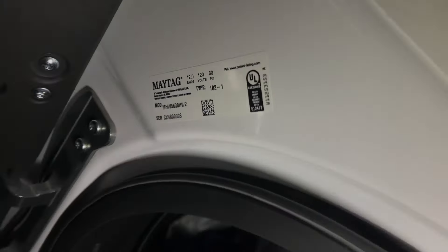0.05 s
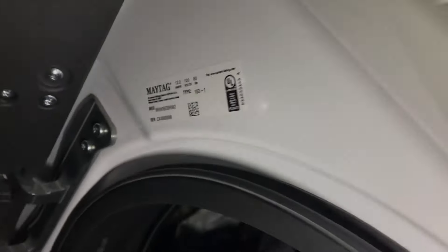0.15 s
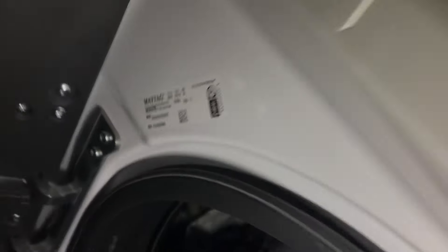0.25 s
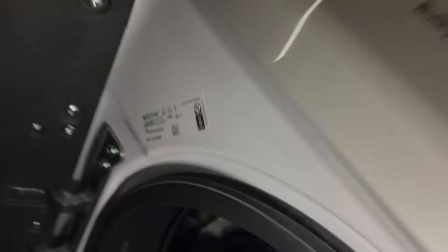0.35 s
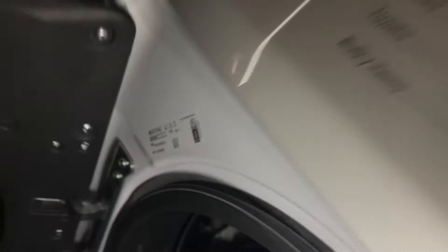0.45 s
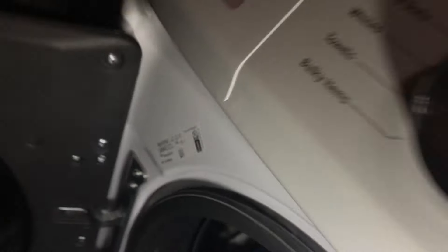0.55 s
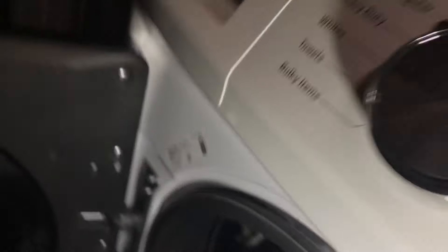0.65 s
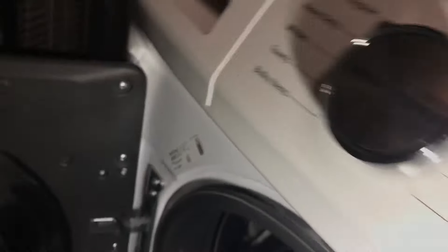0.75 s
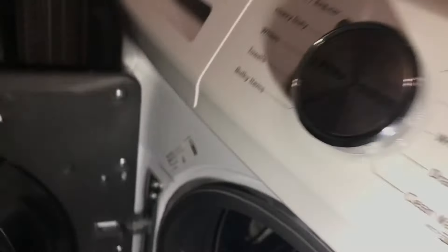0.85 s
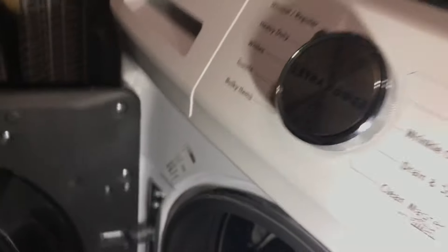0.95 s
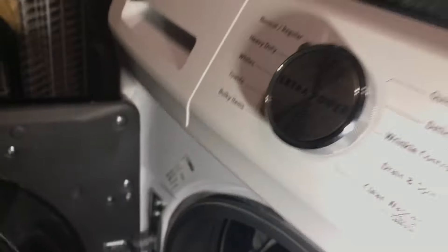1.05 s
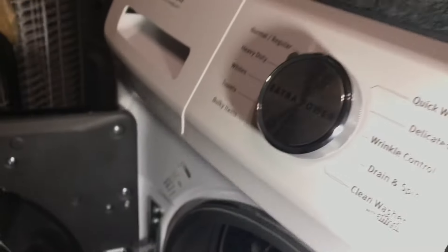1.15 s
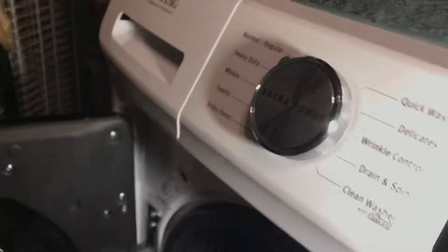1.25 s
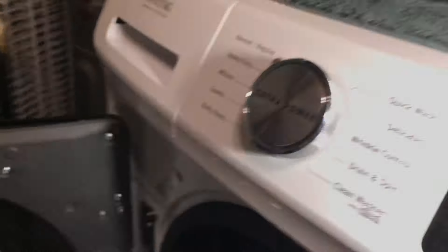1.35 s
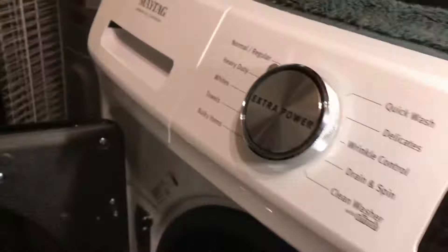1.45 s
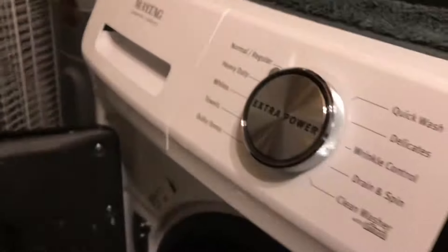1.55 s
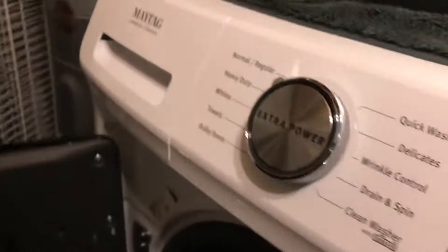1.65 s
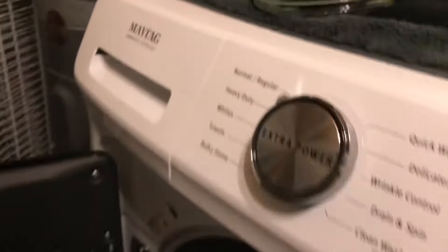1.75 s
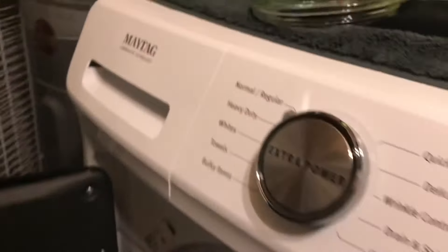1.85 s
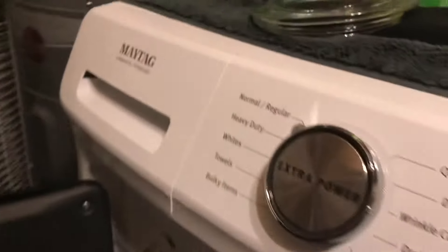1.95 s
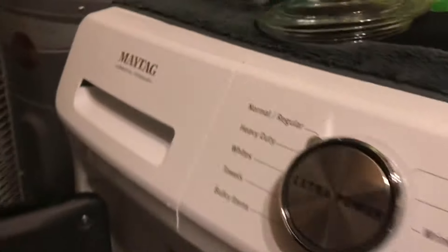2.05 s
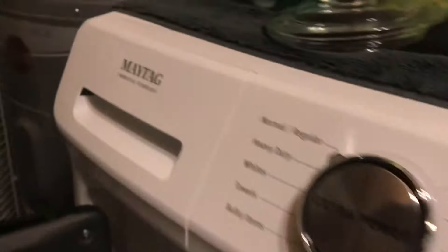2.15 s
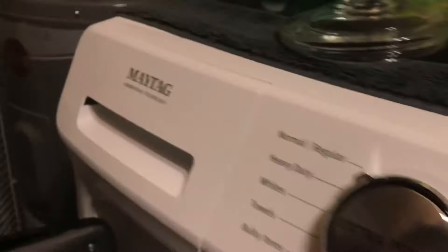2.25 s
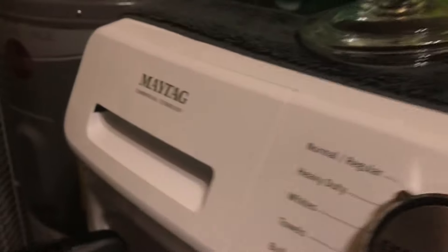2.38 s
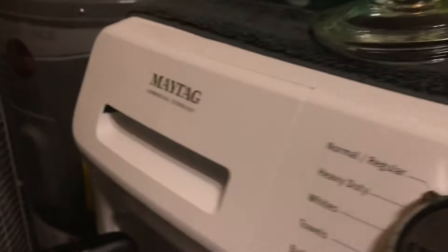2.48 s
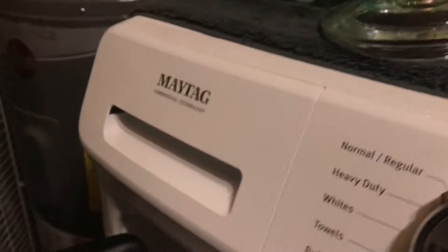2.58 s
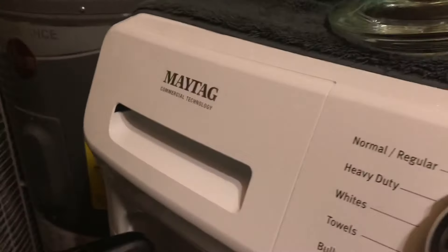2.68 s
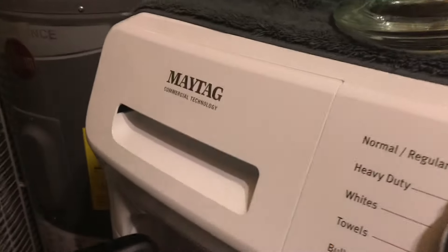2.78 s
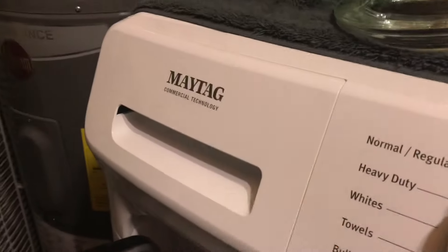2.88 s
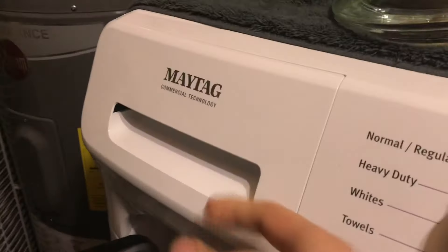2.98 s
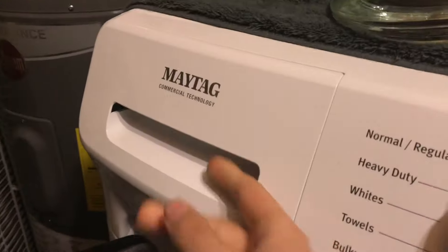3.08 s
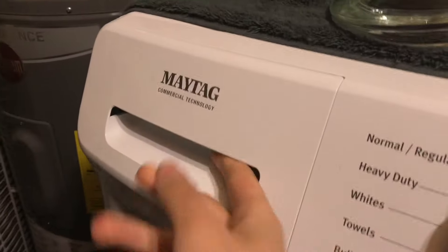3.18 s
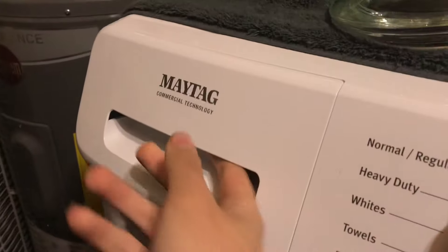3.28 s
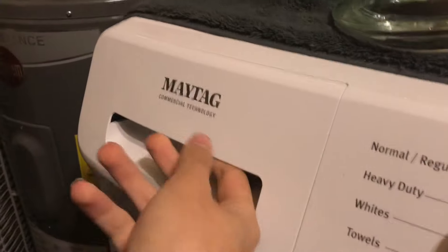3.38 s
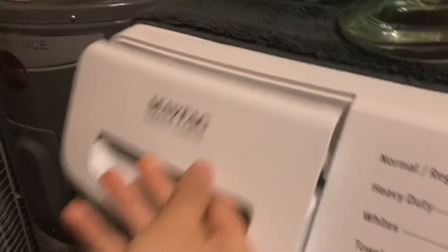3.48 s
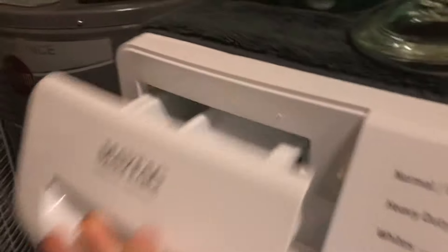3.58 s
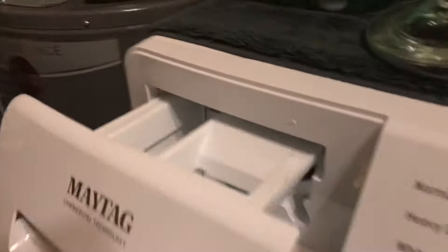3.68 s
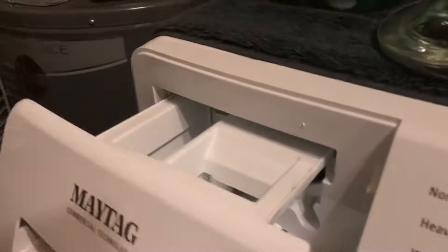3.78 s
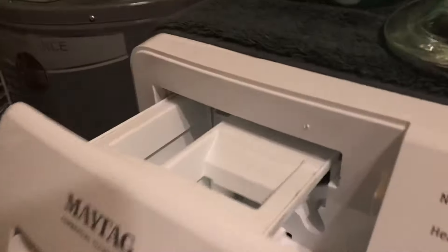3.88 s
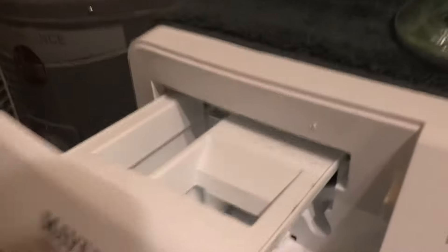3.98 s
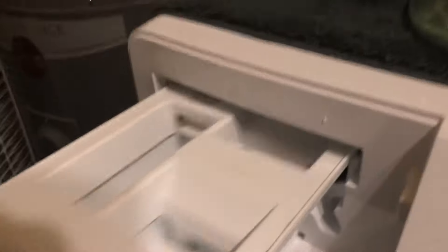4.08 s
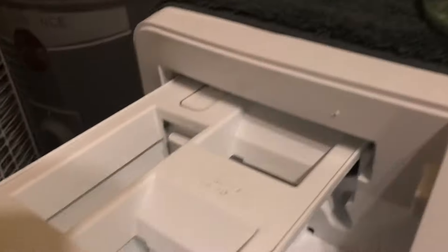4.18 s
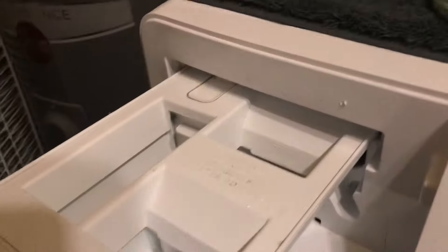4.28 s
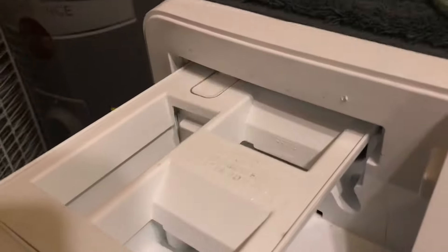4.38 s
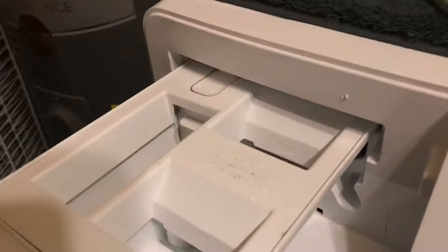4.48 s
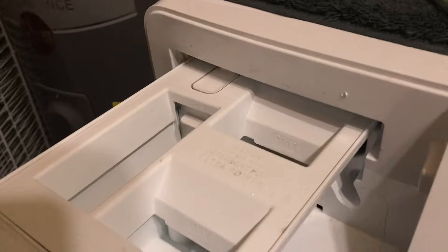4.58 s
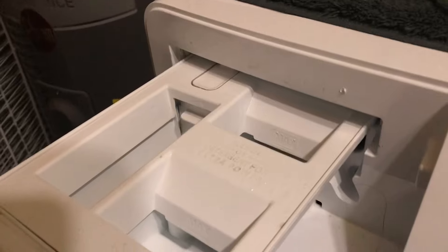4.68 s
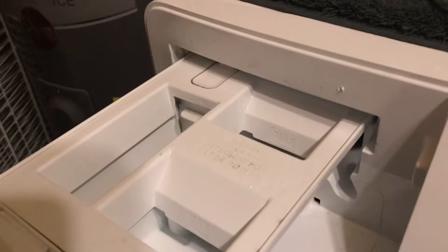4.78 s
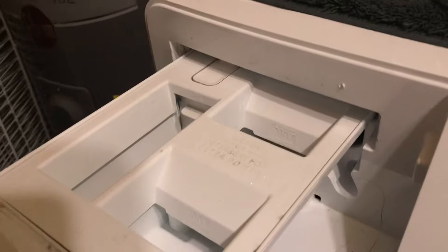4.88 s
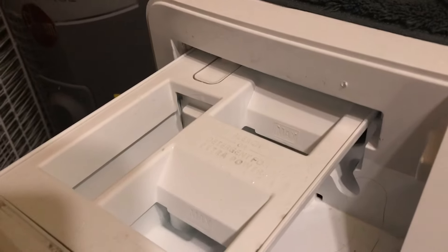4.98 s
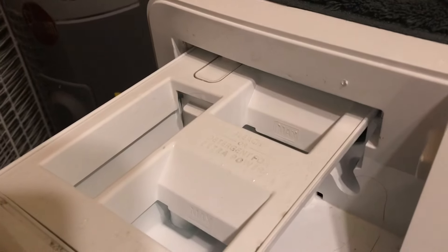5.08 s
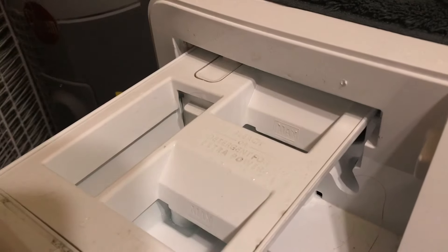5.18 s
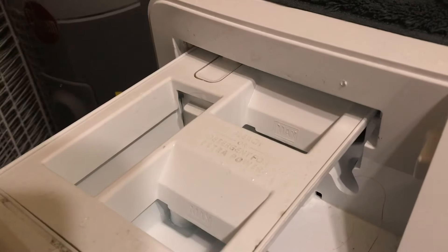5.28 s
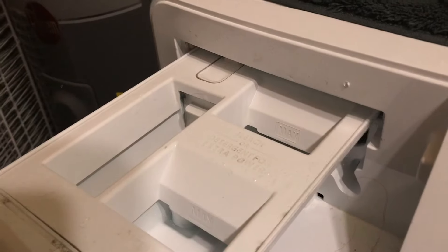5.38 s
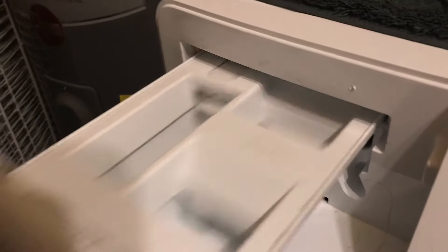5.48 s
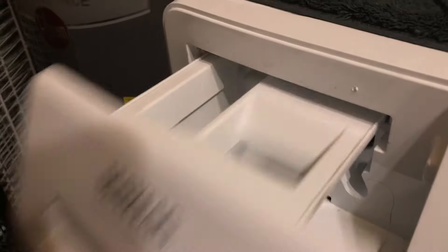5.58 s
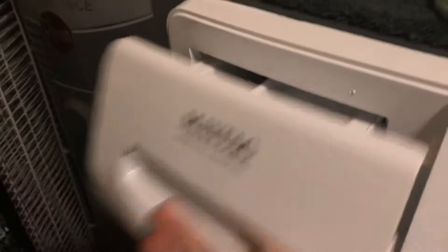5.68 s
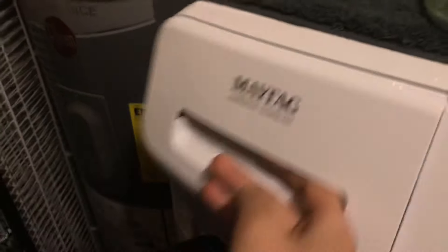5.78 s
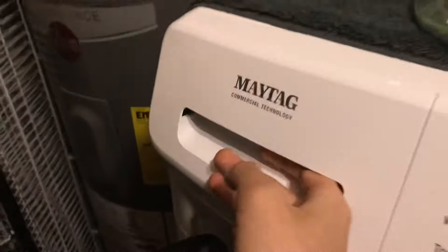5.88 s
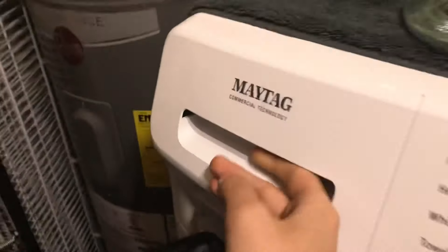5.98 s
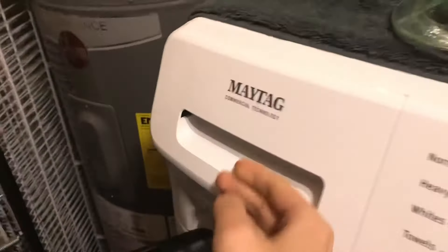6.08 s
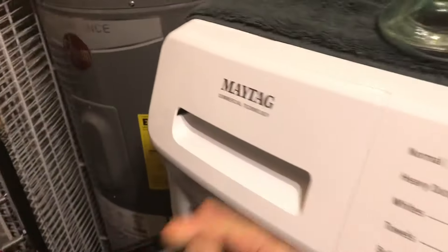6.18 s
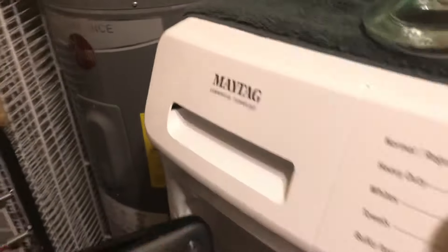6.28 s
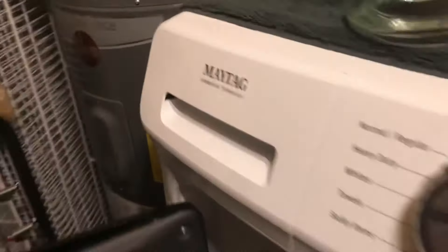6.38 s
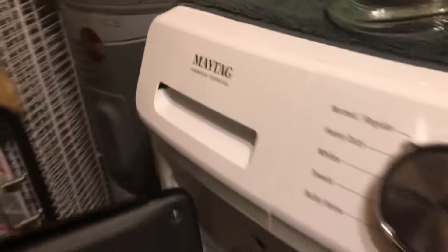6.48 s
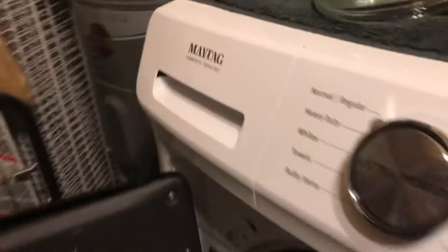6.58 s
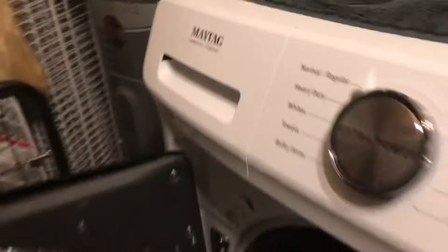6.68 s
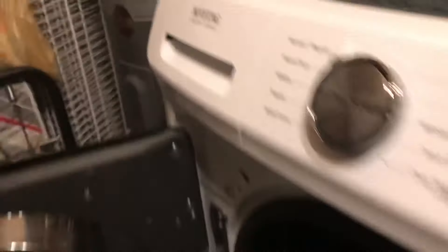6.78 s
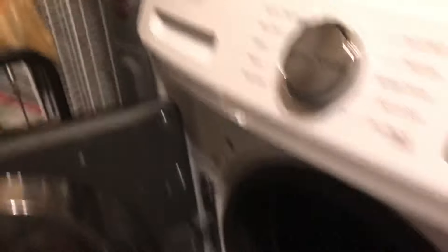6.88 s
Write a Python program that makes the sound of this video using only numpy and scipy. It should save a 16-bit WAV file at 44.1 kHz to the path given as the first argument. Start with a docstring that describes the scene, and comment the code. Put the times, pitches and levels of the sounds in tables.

```python
"""Washer drawer pulled and slammed

Close to a front-load washer in a small, faintly humming room. Clothes rustle and something bumps the cabinet.
The plastic detergent drawer is tugged free, slides out against its stop, then is pushed back and slams shut.
Blows clack as plastic noise and wall modes and thump as steel modes; rubbing is coloured, grainy noise.
A diffuse echo follows everything near; the hardest blows overload the microphone."""
import sys
import numpy as np
from scipy import signal
from scipy.fft import rfft, irfft, next_fast_len
from scipy.io import wavfile

SR = 44100
rng = np.random.default_rng(int(sys.argv[2]) if len(sys.argv) > 2 else 0)


def generate_wav(signal):
    """Clip the signal to [-1, 1] and save it as 16-bit WAV at the path in sys.argv[1]."""
    frames = np.transpose(np.atleast_2d(signal))
    scaled = np.clip(frames, -1, 1) * 32767
    pcm = np.round(scaled).astype(np.int16)
    wavfile.write(sys.argv[1], SR, pcm)


N = 306054
TIME = np.arange(N) / SR
AFTER = TIME[:SR]   # the second that follows a blow
BAND_EDGES = np.geomspace(25, 17000, 20)   # Hz


def from_db(db):
    """Amplitude factor of a level in dB."""
    return 10 ** (np.asarray(db) / 20)


def fall(seconds, t60):
    """Exponential decay by 60 dB in t60 seconds."""
    return np.exp(-np.log(1000) * seconds / t60)


def rms_one(x, seconds=None):
    """Scale to rms 1, over the whole sound or over its first moments."""
    head = x if seconds is None else x[:int(seconds * SR)]
    return x / np.sqrt(np.mean(head ** 2) + 1e-20)


def at_hz(points, hz):
    """Read a curve of (frequency, value) points along a logarithmic frequency axis."""
    point_hz, values = np.transpose(points)
    return np.interp(np.log(hz), np.log(point_hz), values)


def add(track, s, sound):
    """Mix a sound into the track from s seconds on."""
    start = int(s * SR)
    track[start:start + len(sound)] += sound[:len(track) - start]


def edge(x, hz, kind):
    """Second-order low-pass ("low") or high-pass ("high")."""
    return signal.sosfilt(signal.butter(2, min(hz, .45 * SR), kind, fs=SR, output="sos"), x)


def drift(rate):
    """Random wandering through `rate` new values a second; rms 1."""
    knots = rng.standard_normal(int(rate * N / SR) + 2)
    return rms_one(np.interp(TIME * rate, np.arange(len(knots)), knots))


def noise_bands(size):
    """Centres and half-octave slices of white noise; neighbours are unrelated."""
    white = rng.standard_normal((2, size + SR))
    bands = []
    for k, pair in enumerate(zip(BAND_EDGES, BAND_EDGES[1:])):
        band_pass = signal.butter(2, pair, "band", fs=SR, output="sos")
        # the first second lets the filter settle
        bands.append(signal.sosfilt(band_pass, white[k % 2])[SR:])
    return np.sqrt(BAND_EDGES[1:] * BAND_EDGES[:-1]), np.array(bands)


def coloured(x, spectrum):
    """Give a steady sound a spectrum; rms 1."""
    size = next_fast_len(N)
    hz = np.maximum(np.fft.rfftfreq(size, 1 / SR), 1)
    shaped = rfft(x, size) * from_db(at_hz(spectrum, hz))
    return rms_one(irfft(shaped, size)[:N])


def struck(modes, spread_db, size):
    """Decaying sines; each blow lands elsewhere and weighs them anew."""
    hz, db, t60 = np.transpose(modes)[:, :, None]
    alternating_sign = (-1) ** np.arange(len(hz))[:, None]
    strength = from_db(db + spread_db * rng.standard_normal(hz.shape)) * alternating_sign
    t = AFTER[:size]
    return np.sum(strength * fall(t, t60) * np.sin(2 * np.pi * hz * t), axis=0)


def stroke(start, end, first_db, last_db, attack_s, release_s):
    """Gain of one movement: swells up to its start, changes evenly in dB, then falls 60 dB in the release."""
    attack = np.clip(1 + (TIME - start) / attack_s, 0, 1)
    release = fall(np.maximum(TIME - end, 0), release_s)
    return attack * from_db(np.interp(TIME, [start, end], [first_db, last_db])) * release


def friction(colour, grain_db, grain_rate):
    """Countless tiny slips that come in clumps: noise of wandering level; rms 1."""
    return coloured(rng.standard_normal(N) * from_db(grain_db * drift(grain_rate)), colour)


def room_tone():
    """Even background air with a wavering hum."""
    # still air of the room: (frequency [Hz], relative level per Hz [dB])
    air_colour = [(20, -20.5), (53, 1), (119, -8.5), (183, -4.5), (330, -5.5), (445, -12), (600, -12.5),
                  (800, -14.5), (2000, -19), (5000, -23), (8500, -25.5), (10500, -29), (12500, -25.5),
                  (15500, -26.5)]
    # hum of the room: (frequency [Hz], waver rate [new values/s], rms level [dB])
    hum_tones = [(120, 3, -70), (163, 12, -71), (362, 3.4, -70.5)]
    hum = np.zeros(N)
    for hz, width, db in hum_tones:
        cosine_part = drift(width) * np.cos(2 * np.pi * hz * TIME)
        sine_part = drift(width) * np.sin(2 * np.pi * hz * TIME)
        hum += from_db(db) * (sine_part + cosine_part)
    air = edge(coloured(rng.standard_normal(N), air_colour), 37, "high")
    return from_db(-54.5) * air + hum


def swish(x, lag=0.000492, wander=.00002, reflection=0.22):
    """A bounce off the washer front, along a path of wandering length, gives drifting hollow bands."""
    return x + reflection * np.interp(TIME - lag - wander * drift(4.8), TIME, x)


def clothes():
    """Cloth brushes on cloth as grainy noise, each movement with its own treble edge."""
    # cloth rubbing: (frequency [Hz], relative level per Hz [dB])
    cloth_colour = [(100, -2), (230, 12), (450, -11.5), (900, 2), (1400, -9), (2050, -1), (3000, -4),
                    (4250, 0.5), (6300, -4.5), (8200, -3.5), (10500, -8), (13000, -7), (16000, -10)]
    # movements, levels ahead of treble edge and bounce:
    # (start [s], end [s], first level [dB], last level [dB], top edge [Hz])
    brushes = [(0.2, 0.248, -54.5, -52.5, 10000), (0.48, .85, -53, -51.5, 16000),
               (1.53, 1.624, -51.5, -51, 3200)]
    attack_s, release_s = 0.19, 0.99
    cloth = friction(cloth_colour, grain_db=1.2, grain_rate=77)
    rustle = np.zeros(N)
    for *row, top_hz in brushes:
        rustle += stroke(*row, attack_s, release_s) * edge(cloth, top_hz, "low")
    return swish(rustle, wander=.00005, reflection=0.32)


def clack(crowd, low_hz, high_hz, t60, ring_db, ring_hz, hold=0.0049, treble_damping=0.24, spread_db=1.0,
          favour_db=12.5, favour_width=.13, chatter_db=3.5, chatter_rate=600, grit_db=-20, crack_gain=.9):
    """Plastic on plastic: dense modes, the high ones dying first, and ringing walls between two edges."""
    # crowd of weaker plastic modes: (frequency [Hz], relative level per Hz [dB])
    plastic_colour = [(100, 7.5), (400, 7), (700, 0.5), (1000, 5.5), (1500, 2), (2800, -0.5), (4200, -2),
                      (6000, -6.5), (8000, -5.5), (12000, -7.5), (16000, -5.5)]
    # thin drawer walls: (frequency [Hz], typical relative level [dB], t60 [s])
    wall_modes = [(627, -0.5, 0.13), (697, -3, 0.096), (930, -2, .085), (1016, -10.5, 0.089),
                  (1312, -3.5, 0.048), (1580, -2.5, 0.037), (1783, -2, 0.066), (1910, -9.5, 0.067),
                  (2341, -2, 0.068), (2560, -5, 0.072), (2800, -9.5, .065), (3420, -5, .06),
                  (4060, -7, 0.094), (5620, 3, 0.037), (6130, -2.5, .05), (6320, -4, .05)]
    hz, bands = crowd
    size = SR // 4
    t = AFTER[:size]
    start = rng.integers(bands.shape[1] - size)
    life = t60 * (2000 / hz[:, None]) ** treble_damping
    fade = fall(np.maximum(t - hold, 0), life)
    # loose parts chatter against each other: the level jumps about
    jumps = np.interp(t * chatter_rate, np.arange(size), rng.standard_normal(size))
    chatter = from_db(chatter_db * jumps)
    # the first touch is a brief sharp crack
    crack = 1 + crack_gain * np.exp(-t / 0.00094)
    modes = from_db(at_hz(plastic_colour, hz)) @ (bands[:, start:start + size] * fade)
    dense = crack * chatter * modes
    # wall modes near the pitch of the blow are favoured
    favoured = []
    for mode_hz, db, decay_s in wall_modes:
        nearness = np.exp(-(np.log2(mode_hz / ring_hz) / favour_width) ** 2)
        favoured.append((mode_hz, db + favour_db * nearness, decay_s))
    walls = struck(favoured, spread_db, size=size) * (1 - np.exp(-t / 0.00019))
    both = edge(rms_one(dense, .015) + from_db(ring_db) * rms_one(walls, .015), low_hz, "high")
    # some grit gets through above the high edge, more for a bright contact
    grit = from_db(grit_db) * high_hz / 6000 * both
    return rms_one(edge(both, high_hz, "low") - grit, .015)


def touches(crowd):
    """Light touches of hand and loose plastic: brief narrow ticks with hardly any wall ring."""
    # touches: (time [s], rms level of first 15 ms [dB], pitch [Hz])
    light_touches = [(0.495, -42, 510), (.53, -51, 3500), (0.623, -44, 620), (.716, -49, 380),
                     (0.882, -50, 284), (1.668, -48, 4900), (2.021, -41, 2700), (2.321, -57.5, 2000),
                     (4.835, -52, 6200), (5.961, -42.5, 3700), (6.027, -43.5, 2940), (6.062, -45, 5040),
                     (6.262, -45.5, 3920), (6.741, -52, 5540)]
    spread, t60_s = 1.25, 0.041   # edges as a ratio above and below the pitch
    out = np.zeros(N)
    for s, db, hz in light_touches:
        tick = clack(crowd, hz / spread, hz * spread, t60_s, ring_db=-40, ring_hz=hz,
                     hold=0.0008, grit_db=-20)
        add(out, s, from_db(db) * tick)
    return out


def thump(pitch_hz, swell=0.0061, flex_t60=0.068, shudder_db=-4, shudder_t60=.14, panels_db=-3,
          spread_db=4.0, below=1.5, above=1.4):
    """The struck part flexes for a few cycles, its neighbours shudder and the steel panels ring on."""
    # smaller steel panels of the cabinet: (frequency [Hz], typical relative level [dB], t60 [s])
    cabinet_modes = [(121.7, -7, 0.12), (149.8, 0.5, 0.26), (182, -5, 0.34), (221.3, 3, 0.22),
                     (250.6, -6, 0.35), (297, -6.5, 0.3), (324.5, -2, 0.29), (350, -9, 0.14),
                     (410.3, -7, 0.17), (453, -1.5, 0.058)]
    rise = 1 - np.exp(-AFTER / swell)
    flex = np.sin(2 * np.pi * pitch_hz * AFTER) * fall(AFTER, flex_t60)
    shudder = rng.standard_normal(SR) * fall(AFTER, shudder_t60)
    panels = struck(cabinet_modes, spread_db, size=SR)
    parts = []
    for x in (flex, shudder, panels):
        without_bass = edge(x * rise, pitch_hz / below, "high")
        parts.append(rms_one(edge(without_bass, pitch_hz * above, "low"), .03))
    mixed = from_db([0, shudder_db, panels_db]) @ np.array(parts)
    # small parts radiate little deep bass
    return rms_one(edge(mixed, pitch_hz / below, "high"), .03)


def blows(crowd):
    """Each blow clacks in the plastic, thumps in the cabinet and rebounds once."""
    # blows on drawer and cabinet, clack level over its first 15 ms, thump level over its first 30 ms:
    # (time [s], clack level [dB], clack pitch [Hz], chatter length [s],
    #  wall ring [dB re dense plastic modes], thump level [dB], thump pitch [Hz])
    drawer_blows = [ (1.841, -27.5, 1660, .001, -14, -63, 300), (1.855, -33, 1150, 0.019, -14, -18, 135),
                    (1.904, -45, 700, 0.019, -10, -39, 165), (2.034, -43, 1690, 0.013, -13, -49, 200),
                    (3.071, -55, 500, .01, -24, -42, 141), (3.414, -31, 4400, 0.0079, -4, -25.5, 168),
                    (3.433, -26.5, 490, .012, -2.5, -23, 148), (3.451, -19, 800, .007, -8, -17, 176),
                    (3.461, -11.5, 1700, .012, -5, -20.5, 191), (3.475, -16.5, 1560, .012, -8, -13.5, 172),
                    (3.560, -8.5, 1760, .008, 6, -23.5, 334),
                    (3.621, -19, 1309, 0.0063, -4.5, -15.5, 217.6),
                    (3.977, -42.5, 1100, .003, -9, -37, 170), (4.061, -26, 800, .005, -1.5, -23.5, 180),
                    (4.083, -9, 1320, .004, -7.5, -21, 163), (4.154, 1.5, 1910, .008, -5, -13.5, 139.7),
                    (4.161, -4.5, 690, 0.0043, -7.5, -13, 170),
                    (4.224, -22.5, 604, 0.0041, -15, -24.5, 150), (5.313, -48, 600, .003, -7.5, -36, 185),
                    (5.442, -36, 1700, .003, -12.5, -58.5, 250), (5.485, -32.5, 4400, .004, -7, -38, 175),
                    (5.497, -30, 926, .016, -1.5, -36, 170), (5.548, -2, 2334, .011, -4, -17, 280),
                    (5.676, -22, 700, .005, -1.5, -17.5, 201), (5.715, -24, 1120, .007, -3.5, -17.5, 224),
                    (5.73, -9, 1930, .005, -3, -19, 161), (5.764, -11.5, 1850, 0.0077, -16, -17.5, 212),
                    (5.772, -7, 706, 0.01, -4, -14, 157), (5.813, -14.5, 4870, 0.0036, -4.5, -30, 150),
                    (5.819, -5.5, 662, 0.0032, 5.5, -11.5, 420), (5.824, 3, 3200, 0.0064, -6.5, -7, 141.3),
                    (5.841, -6.5, 1560, 0.013, -6.5, -10.5, 128.2),
                    (6.012, -37, 900, .016, -5.5, -58, 121.8)]
    # a harder contact moves the whole clack up: its edges follow its pitch
    mid_pitch_hz, low_edge_hz, low_edge_follows, high_edge_ratio = 1500, 560, 0.69, 2.74
    # the longer the parts chatter, the more slowly they die away
    usual_chatter_s, clack_t60_s, t60_follows = 0.0054, 0.06, .22
    thump_lag_s = .002   # the cabinet answers a moment after the plastic
    # the rebound is stronger after a deep thump (dB re thump, at the usual pitch)
    rebound_s, usual_rebound_db, rebound_db_per_octave, usual_thump_hz = .066, -15.5, -10, 160
    out = np.zeros(N)
    for s, clack_db, hz, chatter_s, ring_db, thump_db, thump_hz in drawer_blows:
        low_hz = low_edge_hz * (hz / mid_pitch_hz) ** low_edge_follows
        t60 = clack_t60_s * (chatter_s / usual_chatter_s) ** t60_follows
        octaves_up = np.log2(thump_hz / usual_thump_hz)
        rebound_db = thump_db + usual_rebound_db + rebound_db_per_octave * octaves_up
        plastic = clack(crowd, low_hz, high_edge_ratio * hz, t60, ring_db, hz, hold=chatter_s)
        add(out, s, from_db(clack_db) * plastic)
        add(out, s + thump_lag_s, from_db(thump_db) * thump(thump_hz))
        add(out, s + rebound_s, from_db(rebound_db) * thump(thump_hz))
    return out


def boom(swell=0.018, spread_db=-2.5):
    """The heavy body takes a moment to swing up, then drones out."""
    # big side panels and sprung tub: (frequency [Hz], typical relative level [dB], t60 [s])
    boom_modes = [(46, -17, 0.4), (53.5, -13.5, 0.48), (71, 4, 0.24), (74.3, -20.5, 1.7), (89.4, -2, 0.29)]
    swing_up = 1 - np.exp(-AFTER / swell)
    return rms_one(struck(boom_modes, spread_db, size=SR) * swing_up, .06)


def machine_body():
    """The whole machine booms when jolted, and one thin decaying sine lingers after the slam."""
    # jolts that rock the whole machine: (time [s], rms level of first 60 ms [dB])
    jolts = [(1.857, -33), (3.13, -49), (3.53, -27.5), (3.66, -36.5), (4.156, -25), (4.21, -28),
             (5.72, -33), (5.83, -20)]
    ring_s, ring_hz, ring_peak_db, ring_t60_s = 5.83, 1276, -29, 0.5
    out = np.zeros(N)
    for s, db in jolts:
        add(out, s, from_db(db) * boom())
    add(out, ring_s, struck([(ring_hz, ring_peak_db, ring_t60_s)], 0, size=SR))
    return out


def fingers():
    """Skin scrapes unevenly in the handle recess: dull, strongly grained noise."""
    # skin on plastic: (frequency [Hz], relative level per Hz [dB])
    finger_colour = [(40, -26), (80, -1.5), (200, -4.5), (330, -3), (800, -8), (1100, -15), (2000, -8),
                     (3100, -17.5), (4300, -18), (7000, -31), (15000, -33)]
    # scrapes: (start [s], end [s], first level [dB], last level [dB])
    grips = [(3.169, 3.199, -41, -44.5), (3.224, 3.295, -48, -52), (3.39, 3.402, -50, -49.5)]
    attack_s, release_s = .03, .2
    gain = sum(stroke(*row, attack_s, release_s) for row in grips)
    return gain * friction(finger_colour, grain_db=3.0, grain_rate=190)


def runners():
    """The drawer rubs along its plastic runners, in strokes from one catch to the next."""
    # plastic on plastic: (frequency [Hz], relative level per Hz [dB])
    slide_colour = [(290, -39), (500, -7.5), (927, 1.5), (1090, -6), (1200, 4), (1450, -4), (2040, -2),
                    (4980, -3.5), (5920, -2.5), (7450, -9), (15500, -17.5)]
    # strokes: (start [s], end [s], first level [dB], last level [dB], release t60 [s])
    slides = [(3.46, 3.67, -41, -36.5, 0.31), (3.895, 4.161, -46, -27.5, 0.13),
              (5.477, 5.533, -41, -27.5, 0.19), (5.598, 5.824, -38.5, -29, .08)]
    attack_s = 0.02
    gain = sum(stroke(*row, attack_s, release_s) for *row, release_s in slides)
    return gain * friction(slide_colour, grain_db=1.5, grain_rate=370)


def room(x, first_echo=0.02):
    """Diffuse echo of the small room as decaying noise bands; the bass lingers."""
    # echo decay: (frequency [Hz], t60 [s])
    echo_t60 = [(60, 0.5), (170, 0.77), (330, 1.0), (500, 0.5), (1300, 0.37), (3000, 0.19), (12000, 0.34)]
    # echo strength: (frequency [Hz], level [dB re direct sound])
    echo_db = [(60, -13.5), (170, -19.5), (330, -19.5), (500, -25), (1300, -24.5), (3000, -25.5),
               (12000, -28)]
    hz, bands = noise_bands(size=SR)
    fade = fall(AFTER, at_hz(echo_t60, hz)[:, None]) * (AFTER > first_echo)
    fade /= np.sqrt(np.sum(fade ** 2, axis=1, keepdims=True))
    echo = from_db(at_hz(echo_db, hz)) @ (bands * fade)
    return signal.fftconvolve(x, echo)[:N]


def scene():
    """Everything happens within arm's reach, with the room behind it."""
    crowd = noise_bands(size=2 * SR)
    near = clothes() + touches(crowd) + blows(crowd) + machine_body() + fingers() + runners()
    return (near + room(near) + room_tone())[None]


def record(dry, threshold_db=-6, squeeze=0.084, release_db_per_s=24, ceiling=0.95):
    """At the microphone loud peaks turn the gain down a little and clip; it recovers slowly. The top is cut."""
    over = np.maximum(20 * np.log10(np.abs(dry[0]) + 1e-9) - threshold_db, 0)
    # hold each excess and let it sink at a steady rate in dB
    sinking = release_db_per_s * TIME
    held = np.maximum.accumulate(over + sinking) - sinking
    pole = np.exp(-1 / (0.09 * SR))   # the gain follows with a 0.09 s time constant
    smoothed = signal.lfilter([1 - pole], [1, -pole], held)
    turned_down = dry * from_db(-squeeze * smoothed)
    clipped = np.clip(turned_down, -ceiling, ceiling)
    top_cut = signal.ellip(10, .1, 80, 15700, fs=SR, output="sos")
    return signal.sosfilt(top_cut, clipped)


dry = scene()
out = record(dry)
generate_wav(out)
```